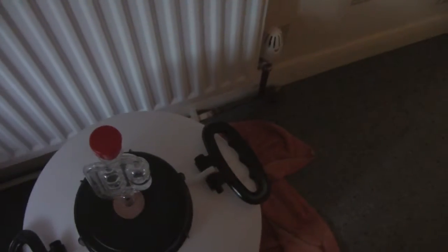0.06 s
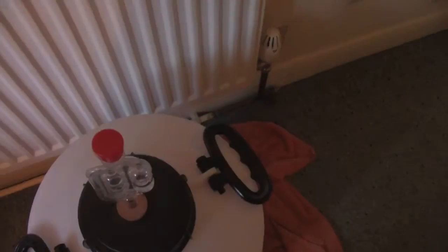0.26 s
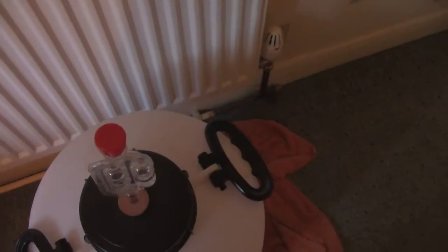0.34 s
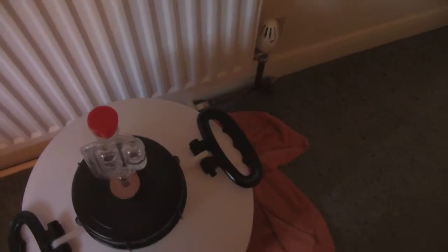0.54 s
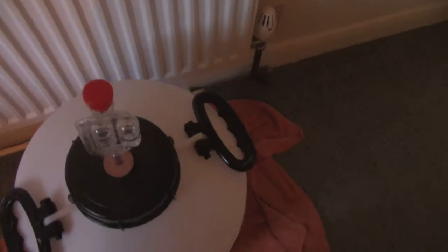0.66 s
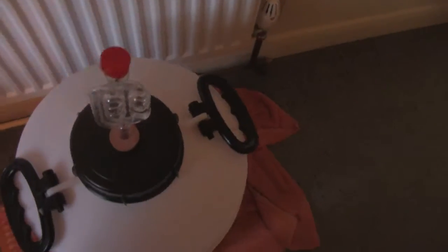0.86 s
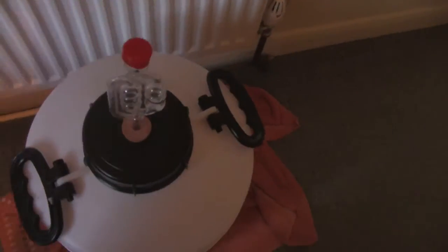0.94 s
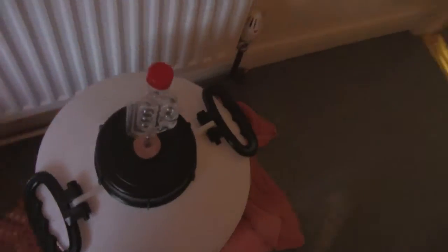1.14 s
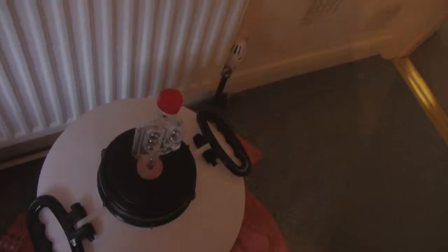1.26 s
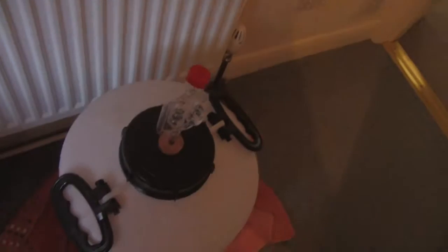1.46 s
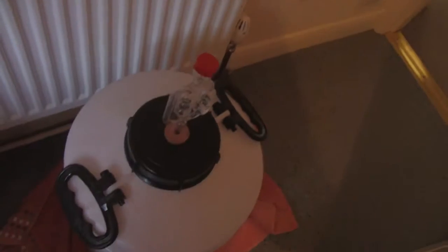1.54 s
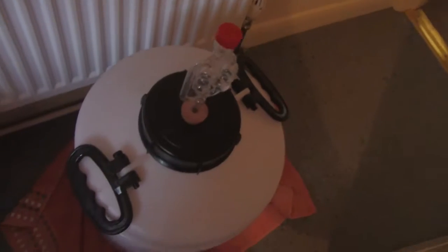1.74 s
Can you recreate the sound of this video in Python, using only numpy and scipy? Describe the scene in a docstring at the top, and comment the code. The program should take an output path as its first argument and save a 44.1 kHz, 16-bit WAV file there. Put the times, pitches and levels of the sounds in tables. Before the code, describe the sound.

Gas bubble bursts with one loud plasticky pop in a water airlock, followed by tiny watery clicks

```python
"""A fermenting bucket's water airlock lets gas out, close to the microphone in a small carpeted room.
A small bubble goes first, then a big one: the film's crack is shaped noise, the air chamber and plastic
body ring as decaying sines, and a wall echo and a diffuse tail of noise answer.
Wet ticks are clicks within stronger short bursts of fizz; rustles are soft swells of grainy noise.
Behind them lie dull bumps of the hand-held microphone, rumble, a faint drone, hiss and a late low hum."""
import sys
import numpy as np
from scipy import signal
from scipy.fft import rfft, irfft
from scipy.io import wavfile

SR = 44100
rng = np.random.default_rng(int(sys.argv[2]) if len(sys.argv) > 2 else 0)


def transcribe(signal):
    """Save signal, clipped to [-1, 1], as a 16-bit WAV file at the path in sys.argv[1]."""
    frames = np.atleast_2d(signal).T
    limited = np.clip(frames, -1, 1)
    pcm = np.round(limited * 32767).astype(np.int16)
    wavfile.write(sys.argv[1], SR, pcm)


N = 81585  # length in samples

# Stereo width of the rustles, rubs and background. Each row: frequency in Hz, side minus mid in dB.
WIDTH = [(30, -28.5), (70, -21), (140, -4), (300, -3), (700, -3.5), (2000, -10.5), (12000, -12.5)]
DIRECT_SIDE_DB = -15  # side minus mid of the close noises


def amp(db):
    """Decibels to gain."""
    return 10 ** (np.asarray(db) / 20)


def clock():
    """Time of every sample, in seconds."""
    return np.arange(N) / SR


def at_hz(points, hz):
    """Read a table on a log-frequency axis."""
    f, v = np.transpose(points)
    return np.interp(np.log(np.maximum(hz, 1)), np.log(f), v)


def bins():
    """Frequency of every spectral bin, in Hz."""
    return np.arange(N // 2 + 1) * SR / N


def noise(gain, side_db):
    """Stereo noise with a given gain per bin and stereo width; rms 1."""
    mid, side = rfft(rng.standard_normal((2, N)))
    opposite = np.array([[1], [-1]])  # the side signal is inverted on the right
    x = irfft(gain * (mid + amp(side_db) * side * opposite), N)
    return x / x.std()


def band(low_hz, high_hz, order=3):
    """Gain per bin of a band with Butterworth edges."""
    f = bins() + 1
    low_edge = 1 + (low_hz / f) ** (2 * order)
    high_edge = 1 + (f / high_hz) ** (2 * order)
    return 1 / np.sqrt(low_edge * high_edge)


def strike(start, rise, hold, t60):
    """Envelope: straight rise, hold, exponential decay by 60 dB in t60 seconds."""
    t = clock() - start
    decay = np.exp(-np.log(1000) * np.maximum(t - rise - hold, 0) / t60)
    return np.clip(t / rise, 0, 1) * decay


def swell(peak, rise, fall):
    """Bell-shaped envelope with unequal sides."""
    t = clock() - peak
    return np.exp(-(t / np.where(t < 0, rise, fall)) ** 2)


def grain(rough, rate_hz):
    """Uneven gain of a grainy source: the exponential of slow noise; rms 1."""
    g = np.exp(rough * noise(band(23, rate_hz), DIRECT_SIDE_DB)[0])
    return g / np.sqrt(np.mean(g ** 2))


def pops():
    """Each burst rings the air chamber; the tearing film cracks and sets the plastic ringing."""
    # Bursting bubbles. Each row: start in seconds, chamber ring in dB, film crack in dB,
    # frequency in Hz above which the crack dulls.
    bursts = [(0.1946, -43.5, -42.5, 2300), (0.2276, -16, -19.5, 15000)]
    # Colour of the crack. Each row: frequency in Hz, relative density in dB per Hz.
    crack_colour = [(100, -9), (430, 6), (620, -9), (830, 3), (1150, 6.5), (1700, -3), (2500, -2),
                    (3600, -3), (4700, 4.5), (6000, -6.5), (7600, -1.5), (10000, -5), (13500, -9),
                    (16000, -22)]
    # Modes of the plastic body. Each row: frequency in Hz, level in dB before the body gain, t60 in seconds.
    modes = [(1031, -12.5, 0.069), (1187, -13.5, 0.039), (1444, -11, .05), (1830, -14.5, 0.057),
             (2000, -37, .05), (2434, -12, 0.053), (2900, -18, .07), (4016, -14, 0.1), (4200, -11.5, 0.042),
             (4480, -9.5, .03), (4860, -23.5, .06), (5330, -5, 0.029), (6600, -15, .05),
             (7520, -26.5, 0.13), (9130, -20, .04), (10040, -17.5, 0.071)]
    body_db = 3  # gain of all modes, on top of the crack's force
    dull_slope = 2.15  # filter order of the dulling
    chamber_hz, chamber_rise_s, chamber_t60_s = 955, 0.00293, 0.021
    crack_delay_s, crack_rise_s, crack_hold_s, crack_t60_s = 0.00056, 0.0026, 0.0042, 0.027
    tear_rough, tear_grain_hz = 0.18, 900
    chamber_echo_db = -1.5
    chamber_room_db, crack_room_db, body_room_db = -11, -5, -23

    chamber, crack, body = np.zeros((3, 2, N))
    for start, ring_db, crack_db, dull_hz in bursts:
        torn = start + crack_delay_s

        def force(hz):
            """Strength of the tear at each frequency."""
            return amp(crack_db) / np.sqrt(1 + (hz / dull_hz) ** (2 * dull_slope))

        ring = np.sin(2 * np.pi * chamber_hz * (clock() - start))
        chamber += amp(ring_db) * ring * strike(start, chamber_rise_s, 0, chamber_t60_s)

        coloured = noise(amp(at_hz(crack_colour, bins())), DIRECT_SIDE_DB)
        film = irfft(rfft(coloured) * force(bins()), N)
        tear = strike(torn, crack_rise_s, crack_hold_s, crack_t60_s)
        crack += film * grain(tear_rough, tear_grain_hz) * tear

        for hz, db, t60 in modes:
            mode = np.sin(2 * np.pi * (hz * (clock() - start) + rng.random()))
            body += force(hz) * amp(db + body_db) * mode * strike(torn, crack_rise_s, 0, t60)
    crack, body = radiate(crack), radiate(body)
    wall = echo(amp(chamber_echo_db) * chamber)
    to_room = amp(chamber_room_db) * chamber + amp(crack_room_db) * crack + amp(body_room_db) * body
    return chamber + crack + body + wall + room(to_room)


def radiate(x):
    """The small airlock lets out the treble and only a little bass."""
    neck_hz, leak_db = 768, -17.5
    high_pass = signal.butter(5, neck_hz, "high", fs=SR, output="sos")
    return signal.sosfilt(high_pass, x + 1e-18) + amp(leak_db) * x


def echo(x):
    """The chamber's ring as it comes back, delayed, from the nearby wall."""
    delay_s = 0.0076
    return np.array([np.interp(clock() - delay_s, clock(), channel, left=0) for channel in x])


def room(x):
    """Diffuse tail: octave bands of noise, each dying at its own rate."""
    # Decay of the small carpeted room. Each row: frequency in Hz, t60 in seconds.
    decay_times = [(200, 0.39), (900, 0.23), (2000, 0.2), (4800, 0.2), (9000, 0.19), (15000, 0.11)]
    delay_s, rise_s, side_db = 0.0028, 0.0028, -16.5
    centres, tail = np.geomspace(125, 16000, 8), 0
    white = rfft(noise(1, side_db))
    for hz in centres:
        share = at_hz(np.c_[centres, centres == hz], bins())  # triangle around this octave
        tail = tail + irfft(white * share, N) * strike(delay_s, rise_s, 0, at_hz(decay_times, hz))
    tail = tail / np.sqrt(np.sum(tail ** 2) / 2)  # mean energy of the two channels is 1
    return signal.fftconvolve(x.mean(0)[None], tail, axes=1)[:, :N]


def ticks():
    """Tiny bubbles and drops snap as the water settles: a click within a stronger short burst of fizz."""
    # Wet ticks. Each row: start in seconds, level in dB, lower edge in Hz, upper edge in Hz.
    snaps = [(0.5516, -62.5, 300, 1270), (0.7825, -52.5, 1100, 9000), (0.8045, -50, 930, 2270),
             (0.814, -63, 900, 2200), (0.852, -44, 1140, 3300), (0.8517, -47.5, 5300, 9600),
             (0.9076, -60.5, 2000, 9000), (1.002, -62, 900, 7850), (1.235, -58, 713, 7540),
             (1.291, -46, 595, 1820), (1.293, -53.5, 3500, 12200), (1.3035, -54, 348, 5370),
             (1.3354, -47, 650, 2660), (1.3677, -47.5, 525, 2120), (1.367, -55.5, 3080, 8200),
             (1.4186, -55.5, 694, 4000), (1.464, -51.5, 1180, 4930), (1.763, -49, 497, 1860),
             (1.789, -56.5, 1200, 6100)]
    rise_s, hold_s, t60_s = 0.00042, 0.0025, 0.025
    snap_db, room_db = -4, -6.5  # energy of the click against the fizz; send to the room
    x = 0
    for start, db, low, high in snaps:
        fizz = noise(1, DIRECT_SIDE_DB) * strike(start, rise_s, hold_s, t60_s)
        click = np.arange(N) == int((start + rise_s) * SR)
        snap = click * amp(snap_db) * np.sqrt(np.sum(fizz[0] ** 2))
        high = np.clip(high, 1.2 * low, 0.45 * SR)
        colour = signal.butter(2, [low, high], "band", fs=SR, output="sos")
        narrow_gain = np.sqrt(SR / 2 / (high - low) / 2)  # raises narrow bands against wide ones
        x = x + amp(db) * narrow_gain * signal.sosfilt(colour, fizz + snap + 1e-18)
    return x + amp(room_db) * room(x)


def rustles():
    """Short soft swells of grainy noise: handling or clothes close to the microphone."""
    # Swells. Each row: peak in seconds, rise in seconds, fall in seconds, level in dB.
    swells = [(0.789, 0.032, 0.065, -58.5), (0.855, 0.029, 0.033, -61), (0.974, 0.016, 0.044, -54),
              (1.298, 0.022, 0.031, -64.5), (1.385, 0.016, .045, -60.5), (1.765, 0.059, 0.032, -64)]
    # Colour of the rustle. Each row: frequency in Hz, relative density in dB per Hz.
    rustle_colour = [(200, -10), (600, -4), (1100, 4), (2400, 2.5), (3700, 0.5), (6500, -2.5),
                     (9000, -10.5), (15000, -14)]
    rough, grain_hz = 0.31, 400
    level = sum(amp(db) * swell(peak, rise, fall) for peak, rise, fall, db in swells)
    uneven = level * grain(rough, grain_hz)
    return uneven * noise(amp(at_hz(rustle_colour, bins())), at_hz(WIDTH, bins()))


def bumps():
    """Hand on the microphone: rubs are swells of dull noise, thuds are short low decaying sines."""
    # Rubs. Each row: peak in seconds, rise in seconds, fall in seconds, level in dB, upper edge in Hz.
    rub_table = [(0.253, 0.0092, 0.024, -50.5, 400), (1.01, 0.014, 0.059, -62.5, 268),
                 (1.292, .025, .025, -61, 460), (1.76, 0.028, 0.032, -58.5, 1070),
                 (1.83, 0.028, 0.037, -61.5, 181)]
    # Soft thuds. Each row: start in seconds, level in dB, frequency in Hz.
    thud_table = [(0.234, -57, 69.6), (0.989, -48.5, 125), (1.816, -53.5, 73)]
    rub_low_hz = 65
    thud_rise_s, thud_hold_s, thud_t60_s = 0.004, 0.002, 0.035
    width = at_hz(WIDTH, bins())
    rubs, thuds = 0, 0
    for peak, rise, fall, db, high in rub_table:
        rubs = rubs + amp(db) * swell(peak, rise, fall) * noise(band(rub_low_hz, high), width)
    for start, db, hz in thud_table:
        tone = np.sin(2 * np.pi * hz * (clock() - start))
        thuds = thuds + amp(db) * tone * strike(start, thud_rise_s, thud_hold_s, thud_t60_s)
    return rubs + thuds


def background():
    """Room rumble with a faint drone, an unevenly growing hiss and a wavering low hum that sets in late."""
    # Colour of the rumble. Each row: frequency in Hz, relative density in dB per Hz.
    rumble_colour = [(15, -4), (25, 5), (40, -5.5), (80, -1), (150, -6), (220, -9), (300, -5), (600, -11),
                     (1200, -14.5), (3000, -17)]
    # Colour of the hiss. Each row: frequency in Hz, relative density in dB per Hz.
    hiss_colour = [(200, 1), (500, 1), (1500, 1), (3000, -1.5), (6500, -3), (9000, -7), (13000, -11),
                   (16000, -15)]
    # Course of the hiss. Each row: time in seconds, level in dB.
    hiss_course = [(0, -69), (.18, -67), (0.451, -66), (.72, -67), (0.918, -65.5), (1.08, -62.5),
                   (1.22, -63), (1.5, -61.5), (1.62, -58.5), (1.72, -61.5), (1.85, -61.5)]
    rumble_db = -67
    drone_hz, drone_width_hz, drone_db = 223, 14, -76.5
    hum_hz, hum_db, hum_start_s, hum_rise_s = 147.6, -65, 1.39, 0.015
    waver_depth, waver_top_hz = 0.5, 14  # rms depth, upper edge of the wavering
    width = at_hz(WIDTH, bins())

    rumble = amp(rumble_db) * noise(amp(at_hz(rumble_colour, bins())) * band(18, 2000), width)
    drone_peak = 1 / (1 + ((bins() - drone_hz) / drone_width_hz) ** 2)
    drone = amp(drone_db) * noise(drone_peak, width)
    hiss_gain = amp(np.interp(clock(), *np.transpose(hiss_course)))
    hiss = hiss_gain * noise(amp(at_hz(hiss_colour, bins())), width)
    waver = 1 + waver_depth * noise(band(2.1, waver_top_hz), width)
    onset = np.clip((clock() - hum_start_s) / hum_rise_s, 0, 1)
    hum = amp(hum_db) * waver * onset * np.sin(2 * np.pi * hum_hz * clock())
    return rumble + drone + hiss + hum


def scene():
    """The airlock and rustles, close and a touch right of centre, in the quiet room."""
    pan_db = -0.44  # on the left; the right gets the opposite
    close = pops() + ticks() + rustles()
    return close * amp([[pan_db], [-pan_db]]) + bumps() + background()


def record(dry):
    """The top is cut steeply; the recorder rests slightly off zero."""
    offset = 0.0022  # full scale is 1
    stop_hz = 16200  # 60 dB down from here up
    low_pass = signal.cheby2(20, 60, stop_hz, fs=SR, output="sos")
    return offset + signal.sosfilt(low_pass, dry)


dry = scene()
out = record(dry)
transcribe(out)
```